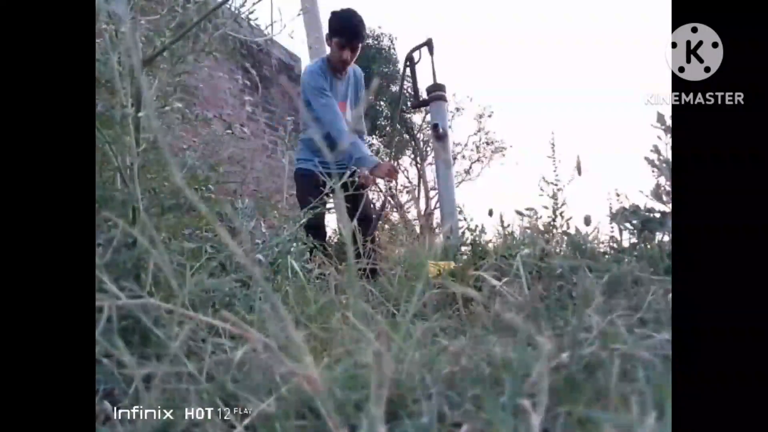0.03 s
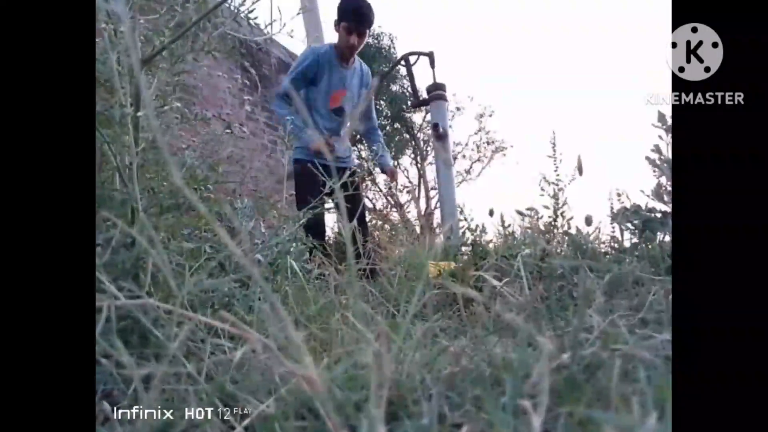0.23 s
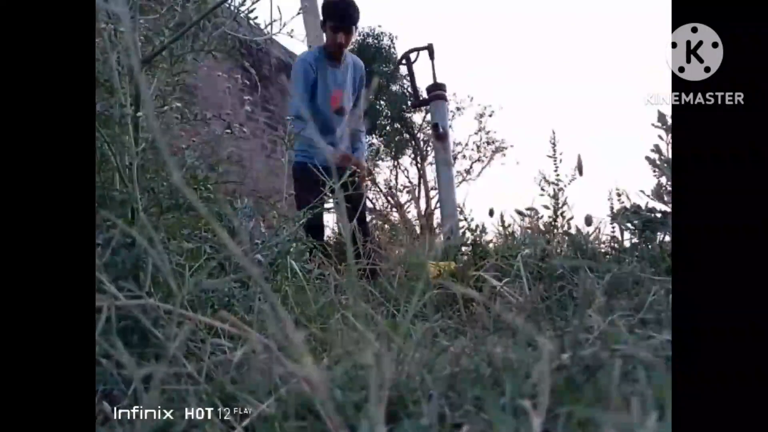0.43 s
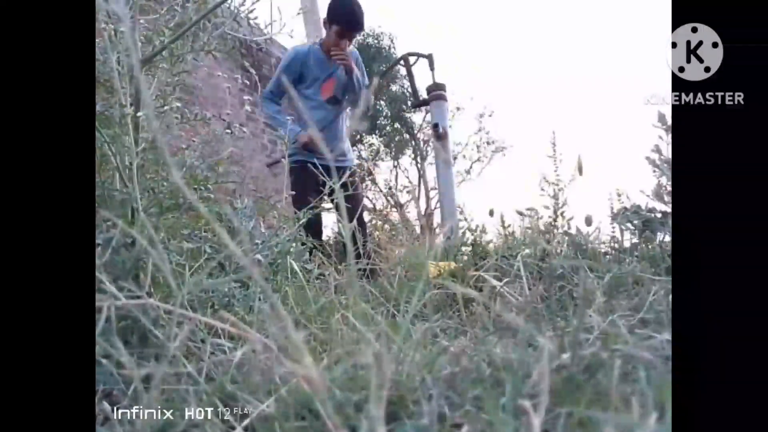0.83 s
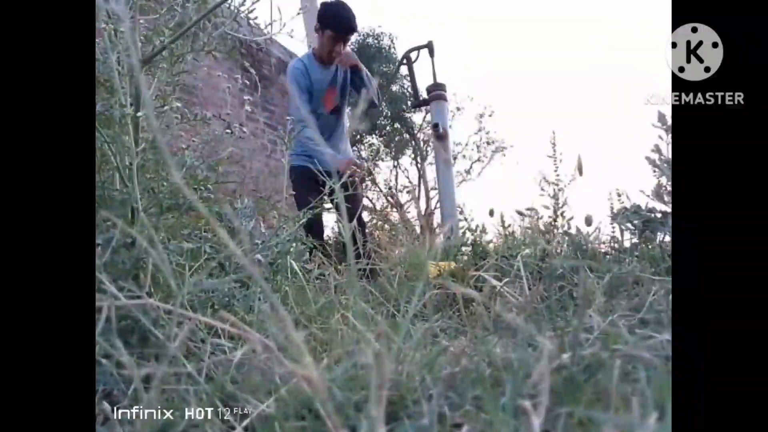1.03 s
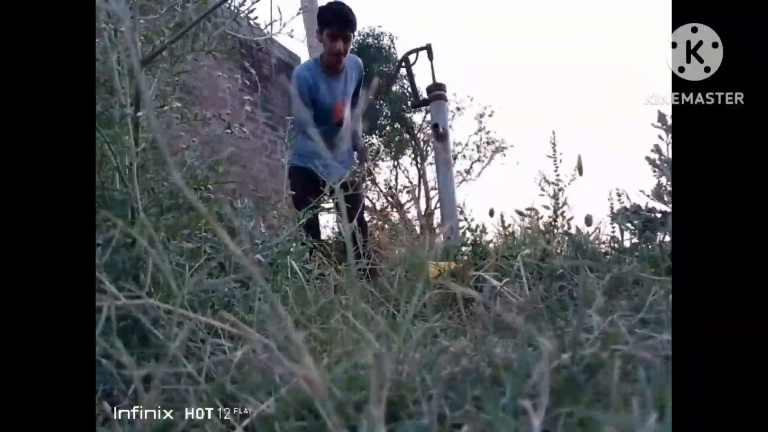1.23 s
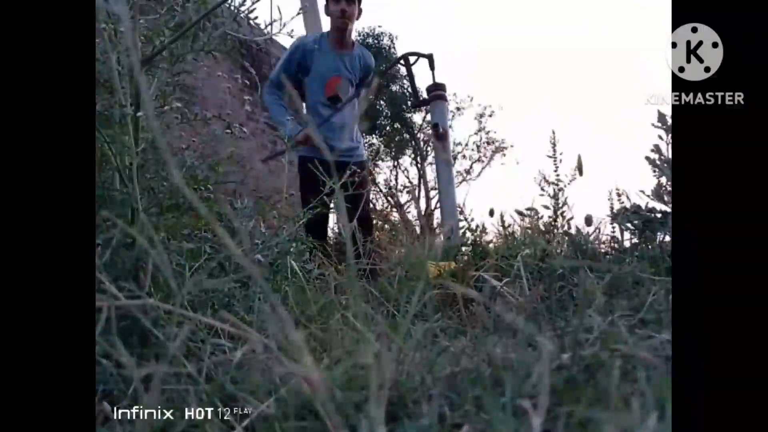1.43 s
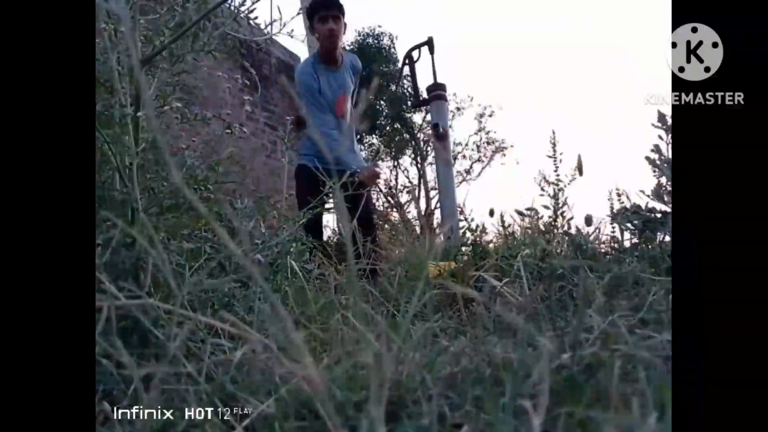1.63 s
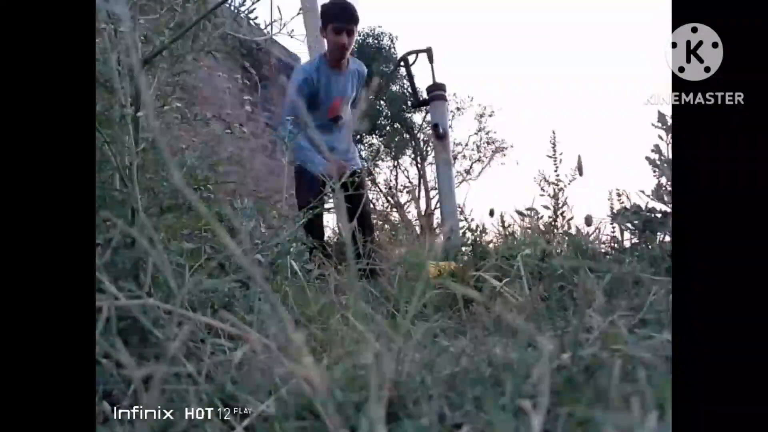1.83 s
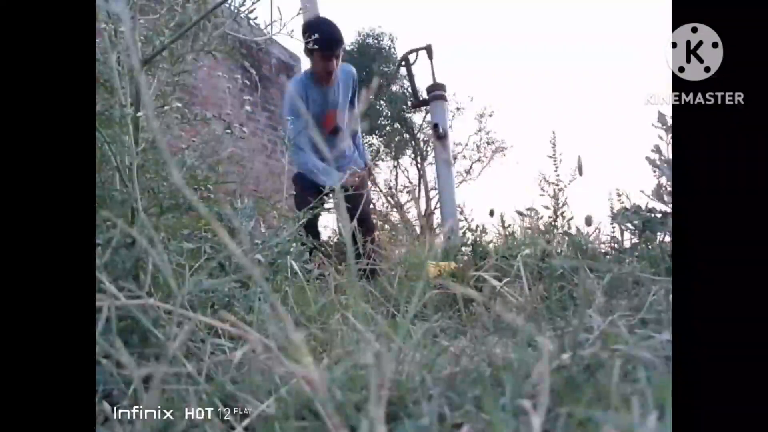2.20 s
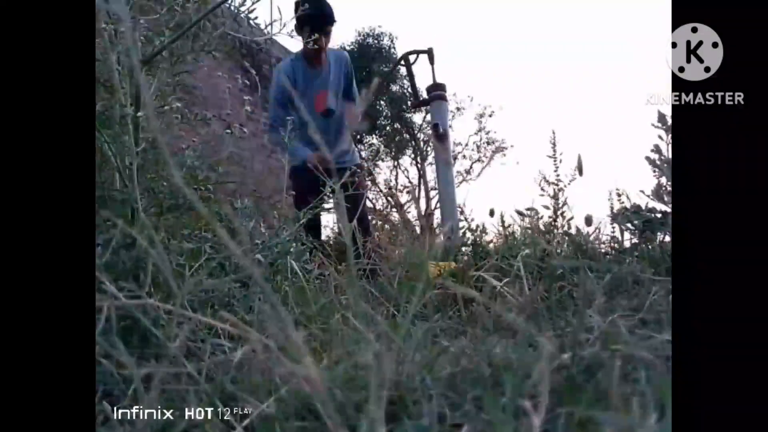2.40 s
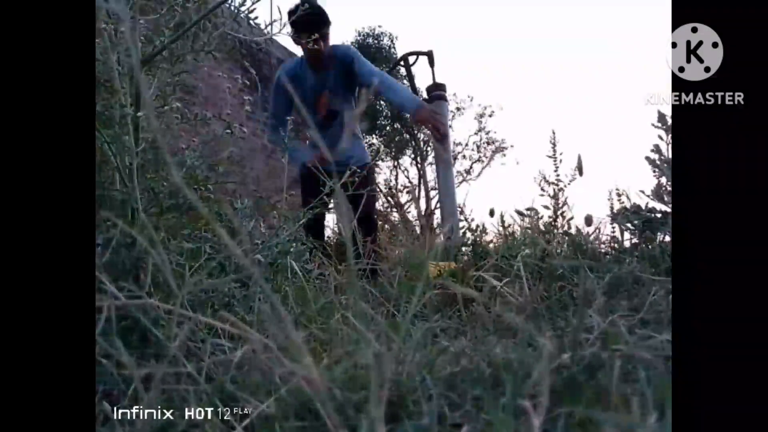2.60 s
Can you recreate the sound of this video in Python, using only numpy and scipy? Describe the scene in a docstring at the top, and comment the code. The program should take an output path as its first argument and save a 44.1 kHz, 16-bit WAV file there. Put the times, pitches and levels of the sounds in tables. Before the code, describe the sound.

A dry metal hand pump squeaks rapidly with thin high whistles, creaks and light clicks.

```python
"""Outdoors beside a wall, a phone microphone on a dry iron hand pump, about three strokes a second.
One way, friction makes the pivot sing a thin high whistle; on the way back the joint sticks and slips:
it chirps, rasps and settles into a falling creak. The loose linkage clicks and rattles, the rod scrapes
and knocks in the barrel, the plunger hisses. Ground and wall return a short scatter, and far off lie
a faint open-air wash and the hum of a motor."""
import sys
import numpy as np
from scipy import signal
from scipy.fft import rfft, irfft
from scipy.io import wavfile

SR = 44100
rng = np.random.default_rng(int(sys.argv[2]) if len(sys.argv) > 2 else 0)


def to_wav(s):
    """Save 16-bit WAV."""
    ch = np.atleast_2d(s).T  # columns
    pcm = np.round(np.clip(ch, -1, 1) * 32767)  # PCM
    wavfile.write(sys.argv[1], SR, pcm.astype(np.int16))


N = 121275

# spectrum of the open air: freq_hz, gain_db
AIR_COLOUR = [(25,-25.5), (60,-10.5), (90,-8), (160,-27), (250,-9), (320,-6), (390,-10), (490,-5),
              (570,-11), (730,-5), (1100,-16), (1700,-17), (2300,-5.5), (2800,-44)]
# hum of the distant motor: pitch_hz, level_db
MOTOR_HUM = [(72,-99), (101,-93.5)]
# spectrum of the plunger's hiss in the barrel: freq_hz, gain_db
PLUNGER_COLOUR = [(900,-17.5), (1500,-7), (2250,6), (2600,-1.5), (3000,-31), (5000,-60)]
# knocks of the rod in the barrel: start_s, pitch_hz, level_db, decay_s, pitch_spread_ratio
ROD_KNOCKS = [(0.026,2110,-56.5,0.025,0.083), (.033,722,-57.5,0.035,0.11), (0.185,1482,-59,0.028,0.052),
              (.188,3004,-49,0.006,0.048), (1.249,2250,-54.5,0.011,0.063), (1.886,337.5,-73,0.02,0.1),
              (2.211,642,-64.5,0.022,0.15), (2.648,773,-69,0.0087,.12)]
# dry scraping of the rod: time_s, level_db
SCRAPE_LEVELS = [(0,-79),(0.021,-72),(0.038,-45.5),(0.079,-51.5),(.095,-65),(.14,-60),(.325,-60.5),(0.388,-47.5),(0.459,-61),(.54,-49.5),(.62,-62),(0.699,-54),(.77,-68.5),(0.891,-52.5),(0.929,-58.5),(1.0,-59),(1.071,-66),(1.135,-47),(1.215,-63.5),(1.269,-56.5),(1.332,-54),(1.384,-75),(1.416,-49),(1.502,-48.5),(1.555,-66.5),(1.631,-50.5),(1.704,-68),(1.743,-51.5),(1.861,-58),(1.928,-53),(2.015,-72),(2.084,-53.5),(2.201,-63.5),(2.262,-48),(2.294,-59.5),(2.35,-73),(2.424,-53.5),(2.51,-58.5),(2.561,-68.5),(2.625,-80.5),(2.685,-81),(2.75,-60)]
# spectrum of that scraping: freq_hz, gain_db
ROD_COLOUR = [(600,-27),(1500,1),(2300,0),(3500,-7.5),(4800,-4),(5800,-13.5),(7500,4),(9800,5.5),(11800,-1),(14500,5.5),(15800,12.5)]
# gritty rattles of the linkage: start_s, length_s, level_db
LINK_RATTLES = [(0.342,0.052,-67), (.484,0.039,-68.5), (0.549,0.013,-70), (0.644,0.076,-77),
                (1.116,0.021,-62), (1.406,0.045,-65), (1.48,.026,-77), (1.746,0.031,-64.5),
                (2.246,0.02,-67.5)]
# modes of the links: pitch_hz, gain_db
LINK_MODES = [(2100,1.5), (3020,-6.5), (3570,0.5), (4400,-2)]
# clicks of the linkage pins: start_s, relative_treble_db, relative_body_db
PIN_CLICKS = [(0.026, -30.5, -75), (0.0378, -29.5, -51), (0.1159, -51, -47), (0.149, -31, -66),
              (0.166, -35, -49.5), (0.19, -30, -46.5), (0.4296, -40, -49), (0.4907, -30.5, -54),
              (0.579, -43, -58), (0.6396, -36, -60.5), (0.7383, -48, -49.5), (0.7824, -38, -51.5),
              (0.8061, -34, -49.5), (0.9406, -47, -54.5), (1.052, -47, -51.5), (1.089, -38.5, -52),
              (1.1018, -33, -64), (1.1112, -32, -51), (1.1357, -33, -69), (1.2266, -37.5, -56.5),
              (1.3716, -37, -44), (1.393, -28.5, -51), (1.4128, -31, -46.5), (1.465, -32, -61),
              (1.569, -34, -52), (1.6782, -36, -50.5), (1.7115, -42, -52.5), (1.737, -25.5, -50),
              (1.7726, -41, -52.5), (1.879, -36, -52.5), (1.8876, -46, -52), (1.9894, -55, -54),
              (2.0336, -37, -54), (2.0631, -24, -46), (2.1943, -54, -56), (2.218, -28, -48),
              (2.327, -55, -55.5), (2.3515, -50, -56), (2.3682, -35, -53.5), (2.4083, -30, -55),
              (2.421, -36, -51.5), (2.506, -35.5, -59), (2.6495, -40.5, -60.5)]
# spectrum of a click's body: freq_hz, gain_db
CLICK_BODY_COLOUR = [(500,-11),(1100,-10),(1600,-4.5),(2400,7),(3600,4),(4500,3.5),(5800,-11.5),(7000,0),(8500,0)]
# spectrum of a click's treble: freq_hz, gain_db
CLICK_TREBLE_COLOUR = [(5800,-28),(7500,-5),(9500,5),(11500,2),(14000,6),(15500,1)]
# resonances of the handle and bracket: pitch_hz, peak_gain_db
IRON_MODES = [(2444,5), (2752,-1), (3550,8.5), (4150,0.5), (5032,7.5), (5506,-3), (6285,6), (7136,-4),
              (8011,-4.5), (8537,-5.5), (10000,-1.5), (14780,-9)]
# squeals as the joint catches, and a few brief rings near 5 kHz just after a creak: start_s, length_s,
# first_hz, last_hz, level_db, octave_level_db
JOINT_CHIRPS = [(0.057,.026,3185,3200,-60.5,-91), (0.354,0.026,7070,7460,-54.5,-46),
                (0.405,0.031,4990,5170,-71,-70), (.639,0.0069,5130,5120,-63,-65),
                (.65,0.039,7230,7210,-56.5,-49), (0.672,0.0096,7200,6920,-47,-35.5),
                (0.695,0.028,5060,5030,-62.5,-71), (0.961,0.016,7150,7160,-52,-45),
                (.972,0.023,6680,6640,-53,-46.5), (1.272,0.039,7160,7300,-60.5,-43),
                (1.597,0.03,4956,5075,-60,-85), (1.622,0.012,8180,8030,-46,-56),
                (1.72,.013,5360,5710,-62,-50), (1.898,0.025,6850,6470,-55,-49),
                (2.252,0.022,5020,4910,-57.5,-44), (2.635,0.0035,6060,5820,-99,-51)]
# each creak holds a pitch, then slips down: rasp_clears_s, slip_s, before_hz, after_hz, stutter_depth
CREAK_SLIPS = [(.385,.405,3010,2900,.3), (.712,.704,2715,2645,2), (.998,1.0,2800,2750,.3),
               (1.328,1.362,2935,2740,.45), (1.63,1.648,2990,2750,.6), (1.936,1.932,2950,2745,.6),
               (2.68,2.737,3115,2760,.5)]
# one creak curve per return stroke: time_s, relative_fundamental_db, relative_overtones_db
CREAK_CURVES = [
    [(0.362, -83, -56), (0.388, -50.5, -52), (0.425, -64.5, -89)],
    [(0.685, -61, -49), (0.703, -51, -44.5), (0.735, -67, -62)],
    [(0.978, -65.5, -57), (1.01, -54.5, -46.5), (1.054, -61.5, -61)],
    [(1.279, -59.5, -53), (1.333, -50, -43), (1.372, -55, -53)],
    [(1.612, -62, -51.5), (1.634, -48, -51.5), (1.677, -59, -54.5)],
    [(1.908, -61.5, -52.5), (1.948, -54, -49.5), (1.984, -61, -57.5)],
    [(2.693, -68, -61.5), (2.719, -55, -49), (2.75, -55, -49.5)],
]
# harmonics 2 to 5 of the creak: gain_db
CREAK_HARMONICS = [-18.5, -4.5, -10, -8]
# spectrum of the creak's rasp: freq_hz, gain_db
RASP_COLOUR = [(1500,-40),(2500,-7),(4500,-5.5),(5800,-7.5),(7000,-5),(9000,8),(11500,5.5),(13500,2.5),(15500,4.5)]
# swells of the pivot's whistle, a few to a stroke: peak_s, width_s, level_db, pitch_hz
WHISTLE_SWELLS = [(0.219,0.023,-33.5,8580), (0.242,0.033,-30,8520), (0.271,0.039,-33.5,8575),
                  (0.301,0.012,-43,8470), (0.512,0.011,-42,8770), (0.521,0.0079,-36,8700),
                  (0.533,0.013,-35,8570), (0.547,0.024,-30,8520), (0.573,0.026,-33.5,8550),
                  (0.599,0.012,-52,8370), (0.862,0.028,-47,8740), (0.883,0.031,-32.5,8490),
                  (0.905,0.0075,-33,8525), (1.144,0.037,-35.5,8555), (1.175,0.021,-29,8530),
                  (1.187,0.016,-50,8430), (1.468,0.024,-36,8550), (1.489,0.0064,-39,8600),
                  (1.497,0.012,-33,8530), (1.512,0.049,-44.5,8580), (1.789,0.0218,-41.5,8530),
                  (1.807,0.015,-31.5,8510), (1.829,0.019,-37.5,8630), (2.088,0.034,-32.5,8510),
                  (2.109,0.025,-33,8600), (2.134,0.039,-33.5,8500), (2.152,0.044,-44,8560),
                  (2.445,0.016,-35.5,8470), (2.461,0.038,-43.5,8580), (2.486,0.027,-34.5,8540),
                  (2.522,0.053,-50,8650)]
# spectrum of the friction hiss round the whistle: freq_hz, gain_db
FRICTION_COLOUR = [(6500,-33),(7800,-4.5),(8500,0.5),(9200,1),(10500,-5),(12000,-24.5),(15000,-14)]


def undb(db):
    """Decibels to amplitude."""
    return 10 ** (np.asarray(db) / 20)


def unit(x):
    """Scale to rms 1."""
    return x / np.sqrt(np.mean(x ** 2))


def clock():
    """Time of each sample in seconds."""
    return np.arange(N) / SR


def walk(rate_hz):
    """Smooth random drift of rms 1, changing about rate_hz times a second."""
    f = np.fft.rfftfreq(N, 1 / SR)
    return unit(irfft(rfft(rng.standard_normal(N)) / (1 + (f / rate_hz) ** 4), N))


def noise(colour):
    """Noise of rms 1, shaped by rows of freq_hz, gain_db."""
    hz, db = np.array(colour, float).T
    f = np.fft.rfftfreq(N, 1 / SR) + 1
    gain = undb(np.interp(np.log(f), np.log(hz), db))
    return unit(irfft(rfft(rng.standard_normal(N)) * gain, N))


def gate(start, end, edge_s=0.00062):
    """1 between two times, with short ramps."""
    t = clock()
    return np.clip(np.minimum(t - start, end - t) / edge_s + .5, 0, 1)


def tone(hz):
    """Sine of rms 1 on a moving pitch."""
    return np.sqrt(2) * np.sin(2 * np.pi * np.cumsum(hz) / SR)


def strike(start, decay_s, attack_s=0.00096):
    """Quick rise and exponential fall."""
    age = np.maximum(clock() - start, 0)
    return np.minimum(age / attack_s, 1) * np.exp(-age / decay_s)


def open_air(level_db=-77, cutoff_hz=2970):
    """Far from the microphone: a steady wash with little treble and a faint motor hum."""
    wash = signal.sosfilt(signal.butter(6, cutoff_hz, fs=SR, output="sos"), noise(AIR_COLOUR))
    hum = sum(undb(db) * tone(hz * (1 + 0.037 * walk(11))) for hz, db in MOTOR_HUM)
    return unit(wash) * undb(level_db + 2.63 * walk(21)) + hum


def wall_scatter(pump, level_db=-17.5):
    """Ground and wall throw a short diffuse echo back to the microphone."""
    scatter = rng.standard_normal(N) * strike(0.0087, decay_s=0.0089)
    return undb(level_db) * signal.fftconvolve(pump, scatter / np.linalg.norm(scatter))[:N]


def plunger_hiss(start_s=0.021, end_s=2.55, level_db=-73.5):
    """The moving plunger makes a wavering hiss in the barrel, which stops at the pause."""
    return gate(start_s, end_s, edge_s=0.018) * undb(level_db + 2 * walk(28.6)) * noise(PLUNGER_COLOUR)


def rod_knocks():
    """The rod bumps the barrel with a rough, quickly damped note."""
    waver = walk(266.6)
    return sum(undb(db) * strike(start, decay, attack_s=0.0023) * tone(hz * (1 + spread * waver))
               for start, hz, db, decay, spread in ROD_KNOCKS)


def rod_scrape():
    """The dry rod rubs with a grainy sound that swells and sinks with the strokes."""
    grains = unit(undb(3 * walk(190) + 1.5 * walk(45)))
    level_db = np.interp(clock(), *np.array(SCRAPE_LEVELS).T)
    return undb(level_db) * grains * noise(ROD_COLOUR)


def link_rattles(impacts_per_s=420):
    """Clusters of tiny impacts, each ringing the modes of the loose links in its own mix."""
    impacts = rng.random(N) < impacts_per_s / SR
    crunch = np.zeros(N)
    for hz, db in LINK_MODES:
        ring = strike(0, decay_s=0.0011) * np.sin(2 * np.pi * hz * clock())
        crunch += undb(db) * signal.fftconvolve(impacts * rng.uniform(-1.2, 1, N), ring)[:N]
    clusters = sum(undb(db) * gate(start, start + length, edge_s=0.0065)
                   for start, length, db in LINK_RATTLES)
    return unit(crunch) * clusters


def pin_clicks(body_gain_db=-1.5, treble_gain_db=-15):
    """Play in the pins: each click is a sharp tick of noise with a short, softer tail."""
    shape = strike(0, decay_s=.0028) + undb(-11.5) * strike(0, decay_s=0.02)
    start, treble_db, body_db = np.array(PIN_CLICKS).T
    out = np.zeros(N)
    for db, colour in ((body_db + body_gain_db, CLICK_BODY_COLOUR),
                       (treble_db + treble_gain_db, CLICK_TREBLE_COLOUR)):
        hits = np.bincount((start * SR).astype(int), undb(db), N)
        out += signal.fftconvolve(hits, shape)[:N] * noise(colour)
    return out


def ironwork(drive, decay_s=0.0086):
    """The driving sound plus the brief ring it raises in the handle and its bracket."""
    t = clock()
    modes = sum(undb(db) * np.cos(2 * np.pi * hz * t) for hz, db in IRON_MODES)
    ring = modes * np.exp(-t / decay_s) * 2 / (decay_s * SR)
    return drive + signal.fftconvolve(drive, ring)[:N]


def joint_chirps(roughness=.52, smear_hz=440):
    """The joint catches: brief gliding squeals with their octave, each smeared into a scratchy band; a few
    short tones near 5 kHz ring on after a creak."""
    t, out = clock(), np.zeros(N)
    waver = 1 + .007 * walk(450)
    steady = np.sqrt(2 * (1 - roughness ** 2))
    # complex gains shake the level and phase of each tone
    smear, octave_smear = (steady + roughness * (walk(rate) + 1j * walk(rate))
                           for rate in (smear_hz, 2 * smear_hz))
    for start, length, first_hz, last_hz, db, octave_db in JOINT_CHIRPS:
        envelope = gate(start, start + length, edge_s=0.0096)
        now = envelope > 0
        hz = np.interp(t[now], [start, start + length], [first_hz, last_hz]) * waver[now]
        phasor = np.exp(2j * np.pi * np.cumsum(hz) / SR)
        squeal = undb(db) * phasor * smear[now] + undb(octave_db) * phasor ** 2 * octave_smear[now]
        out[now] += envelope[now] * squeal.imag
    return out


def joint_creak(chatter_hz=218.6, slip_s=.007, clear_s=0.0134):
    """Stick-slip in the joint: a chattering rasp that clears into plain harmonics and slips in pitch."""
    t = clock()
    sounding = sum(gate(curve[0][0], curve[-1][0]) for curve in CREAK_CURVES)
    times, *levels = np.concatenate(CREAK_CURVES).T
    fundamental_db, overtones_db = (np.interp(t, times, db) for db in levels)
    hz, rough, stutter = np.zeros((3, N))
    for curve, (clears, slips, before_hz, after_hz, depth) in zip(CREAK_CURVES, CREAK_SLIPS):
        stroke = gate(curve[0][0] - .02, curve[-1][0] + .02)
        held = .5 - .5 * np.tanh((t - slips) / slip_s)
        hz += stroke * (after_hz + (before_hz - after_hz) * held)
        rough += stroke * (.5 - .5 * np.tanh((t - clears) / clear_s))
        stutter += stroke * depth
    grip = tone(chatter_hz * (1 + .05 * walk(77)))
    chatter = unit(1 + 0.48 * (0.28 + 0.19 * rough) * grip)
    # a hard grip chops the fundamental into bursts; i0 keeps its mean power steady
    bursts = np.exp(stutter * grip / np.sqrt(2)) / np.sqrt(np.i0(2 * stutter))
    pitch = hz * (1 + 0.01174 * walk(400) - .006 * grip + 0.0217 * rough * walk(640))
    harmonics = sum(undb(db + 4.6 * walk(190)) * tone(k * pitch)
                    for k, db in enumerate(CREAK_HARMONICS, start=2))
    half_harmonics = sum(undb(-8.5 + 2 * walk(90)) * tone(k * pitch) for k in (2.5, 3.5, 4.5))
    rasp = noise(RASP_COLOUR) * (rough * undb(-0.5) + undb(-8))  # some hiss stays once it clears
    fundamental = undb(fundamental_db - 1.5 + 2.2 * walk(100)) * tone(pitch)
    overtones = harmonics * (1 - 0.28 * rough) + half_harmonics * rough + rasp
    return sounding * (bursts * fundamental + chatter * undb(overtones_db) * overtones)


def pivot_whistle(edge_db=-13, hiss_db=-24):
    """Friction drives one high mode of the dry pivot; it swells and falters as the grip changes."""
    t = clock()
    power, weighted_hz = np.zeros((2, N))
    for peak, width, db, hz in WHISTLE_SWELLS:
        now = np.abs(t - peak) < 2 * width
        swell = undb(db + edge_db * np.abs(2 * (t[now] - peak) / width) ** 2.53) ** 2
        power[now] += swell
        weighted_hz[now] += swell * hz
    pitch = weighted_hz / np.maximum(power, np.finfo(float).tiny)  # overlapping swells share one pitch
    whistle = tone(pitch * (1 + .0018 * walk(260)))
    flutter = undb(.3 * walk(152))
    return np.sqrt(power) * flutter * (whistle + undb(hiss_db) * noise(FRICTION_COLOUR))


def scene():
    """At the microphone, in mono: the pump direct, its scatter, and the open air behind."""
    pump = pivot_whistle() + ironwork(joint_creak() + joint_chirps() + pin_clicks() + rod_scrape())
    pump += link_rattles() + link_rattles()  # two independent layers thicken the grit
    pump += rod_knocks() + plunger_hiss()
    return (pump + wall_scatter(pump) + open_air())[None]


def record(dry, cutoff_hz=15450):
    """The phone cuts the top of the treble steeply."""
    return signal.sosfilt(signal.ellip(8, .2, 70, cutoff_hz, fs=SR, output="sos"), dry)


dry = scene()
out = record(dry)
to_wav(out)
```